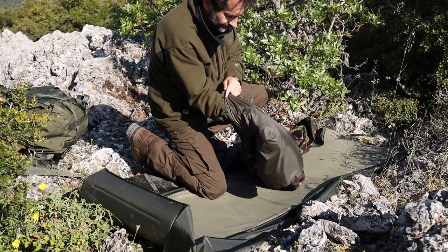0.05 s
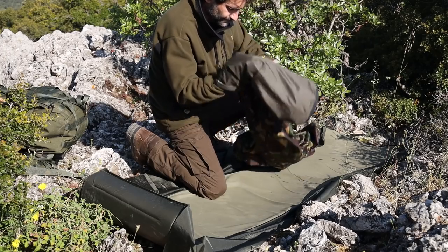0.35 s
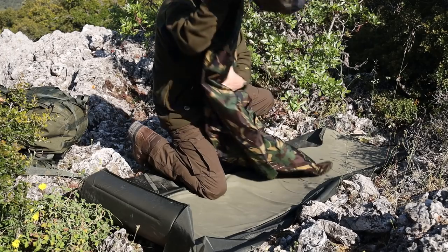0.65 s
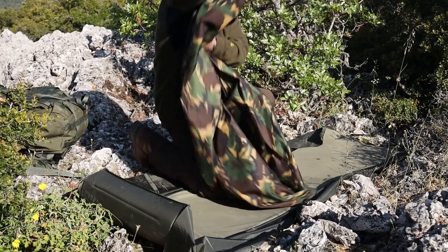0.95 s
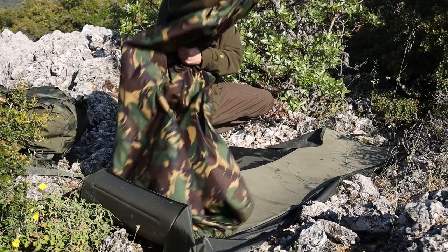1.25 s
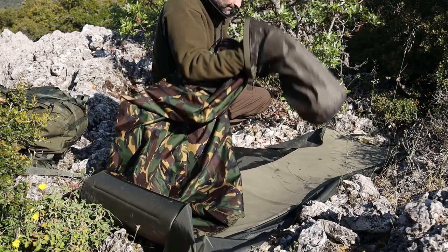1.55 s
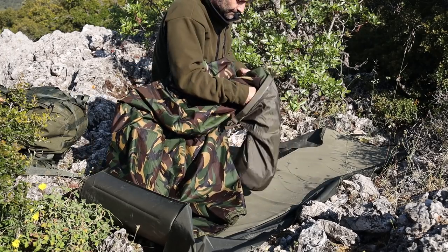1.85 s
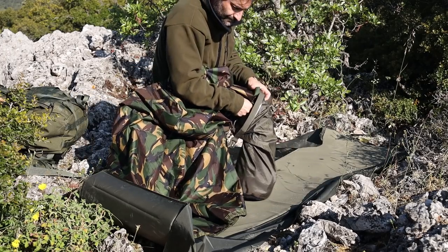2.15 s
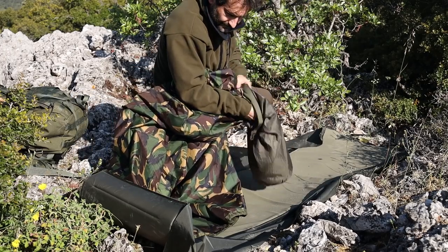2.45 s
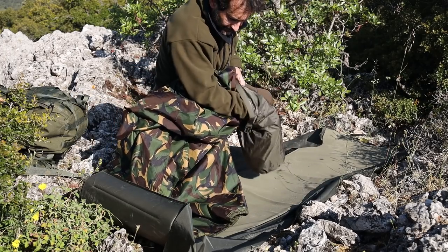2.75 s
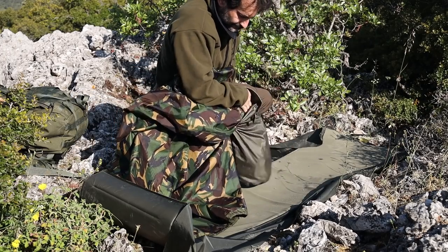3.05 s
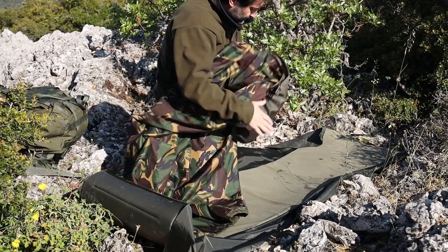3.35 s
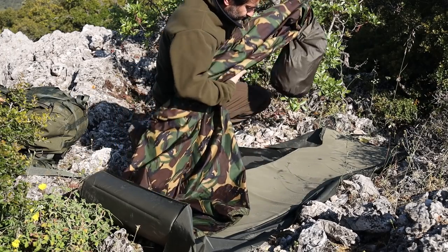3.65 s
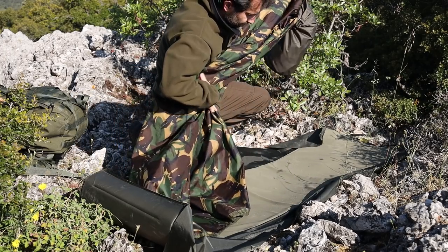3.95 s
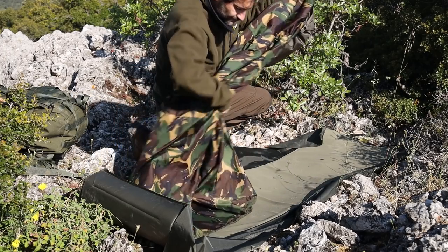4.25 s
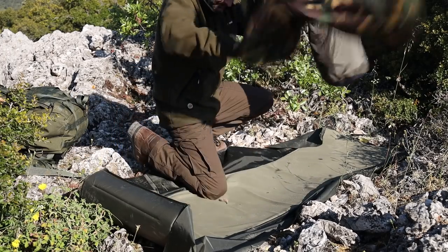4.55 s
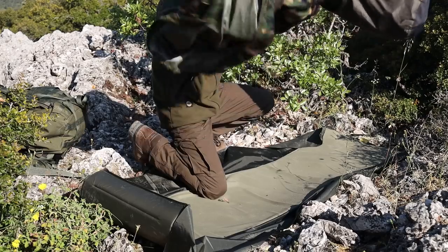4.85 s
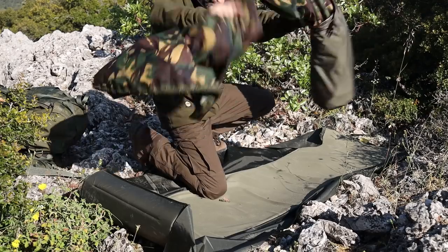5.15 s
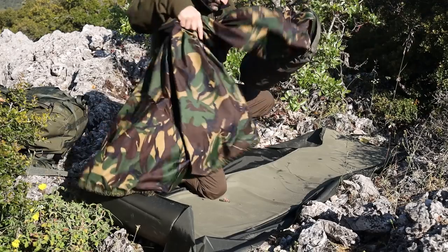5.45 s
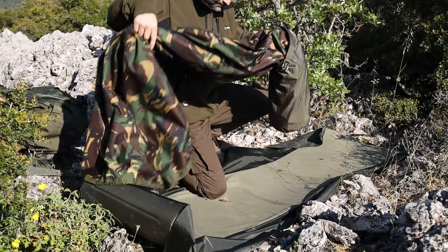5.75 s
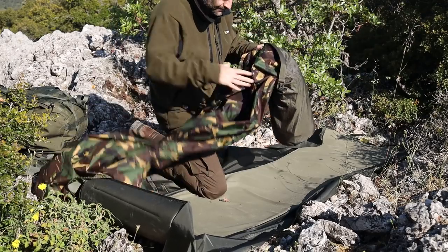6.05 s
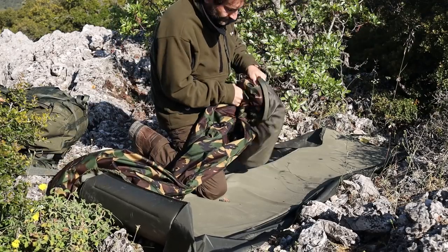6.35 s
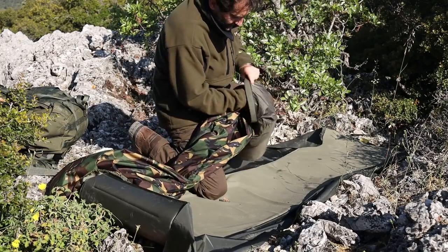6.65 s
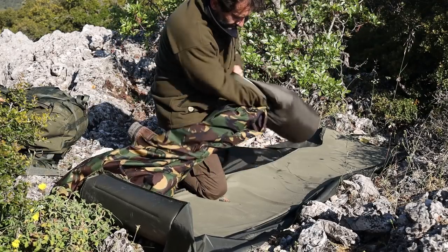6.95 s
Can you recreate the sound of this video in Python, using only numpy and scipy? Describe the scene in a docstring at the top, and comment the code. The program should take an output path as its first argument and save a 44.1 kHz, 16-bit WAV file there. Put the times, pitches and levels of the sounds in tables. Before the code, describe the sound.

A nylon sheet rustles and crinkles as it is pulled from a sack, shaken with loud flaps, then stuffed back, close up outdoors.

```python
"""A soft hiss of nylon sliding on nylon comes first: a camouflage sheet is pulled out of its sack,
outdoors, close to a single microphone. Small folds buckle in dense swarms, heavy folds thud, the weave
zips over itself and single creases pop. Shaken open, the sheet flaps and whips twice, shoving air at
the microphone; then it is stuffed back in. The ground below gives one short echo."""
import sys
import numpy as np
from scipy import signal
from scipy.fft import rfft, irfft, next_fast_len
from scipy.io import wavfile
from scipy.ndimage import map_coordinates

SR = 44100
rng = np.random.default_rng(int(sys.argv[2]) if len(sys.argv) > 2 else 0)


def store_wav(level_fs):
    """Save 16-bit WAV to argv[1]."""
    pcm = np.round(np.clip(np.atleast_2d(level_fs), -1, 1) * 32767)
    wavfile.write(sys.argv[1], SR, pcm.T.astype(np.int16))


N = 313351


def amp(db):
    """Decibels to gain."""
    return 10 ** (np.asarray(db) / 20)


def unit(x):
    """Scale to rms 1."""
    return x / np.sqrt(np.mean(x ** 2) + 1e-20)


def filtered(x, response):
    """Filter x by a gain that depends on frequency."""
    size = next_fast_len(len(x) + 8192)
    return irfft(rfft(x, size) * response(np.fft.rfftfreq(size, 1 / SR)), size)[:len(x)]


def colour(points):
    """Gain against frequency, through (frequency [Hz], level [dB]) points."""
    knots_hz, db = np.transpose(points)
    return lambda hz: amp(np.interp(np.log(hz + 1), np.log(knots_hz), db))


def coloured(x, points):
    """x with a colour, at rms 1."""
    return unit(filtered(x, colour(points)))


def wobble(rate):
    """A smooth random curve, rate knots a second."""
    return map_coordinates(rng.standard_normal(int(N * rate / SR) + 4), [np.arange(N) * rate / SR])


def add(track, s, sound):
    """Mix a sound into the track from time s."""
    start = max(round(s * SR), 0)
    part = track[start:start + len(sound)]
    part += sound[:len(part)]


def swell_at(t, length, rise_share):
    """A movement builds up for its share of the length, peaks at t = 0 and dies away."""
    return np.exp(-np.abs(t) / (length * np.where(t < 0, rise_share, 1 - rise_share)))


# Arms pull, shake and stuff the cloth in front of the microphone; levels are relative:
# (fastest moment [s], length [s], small folds [dB], sliding [dB], heavy folds [dB])
ARM_STROKES = [(0.028, 0.041, -58, -47, -60), (0.262, 0.27, -43.5, -47.5, -52), (0.425, .1, -56, -48, -64),
               (0.633, 0.36, -36, -42, -45.5), (0.84, 0.3, -42.5, -42.5, -53),
               (1.025, 0.19, -38, -46, -45.5), (1.172, 0.093, -37, -48.5, -71),
               (1.33, 0.27, -36.5, -47.5, -46), (1.59, 0.44, -44, -49.5, -51), (1.89, 0.2, -46, -51, -58),
               (2.21, 0.077, -55, -58.5, -62), (2.386, 0.17, -59, -48.5, -65),
               (2.562, .14, -37.5, -38, -44), (2.858, 0.36, -46, -49.5, -53),
               (3.244, 0.11, -42.5, -49.5, -42.5), (3.527, 0.25, -34.5, -42.5, -47.5),
               (3.672, 0.25, -46, -49, -65), (3.834, 0.24, -38.5, -45, -55),
               (4.16, 0.15, -41, -50.5, -49.5), (4.418, 0.23, -33.5, -43.5, -37.5),
               (4.618, 0.11, -19.5, -35, -45), (4.72, 0.12, -28, -33, -36), (4.814, 0.29, -32, -50, -50),
               (5.02, 0.25, -26.5, -37.5, -38), (5.293, 0.16, -25, -40.5, -41),
               (5.444, 0.14, -31, -43, -44), (5.526, 0.11, -36, -53, -40), (5.74, .2, -59, -55.5, -71),
               (6.066, 0.45, -38, -47.5, -47.5), (6.337, 0.25, -45.5, -48, -56),
               (6.468, 0.026, -43.5, -49, -45), (6.65, 0.27, -44, -49.5, -49.5),
               (6.82, 0.2, -45.5, -40, -50), (6.947, 0.11, -33.5, -38, -38)]

def handling(held_db=(-54, -56, -59)):
    """Levels of small folds, sliding and heavy folds: never quite at rest, swelling with each stroke."""
    t = np.arange(N) / SR
    power = np.outer(amp(held_db) ** 2, np.ones(N))
    for s, length, *levels_db in ARM_STROKES:
        reach = 1.31 * length  # the arm is at rest this long before and after its fastest moment
        moving = np.abs(t - s) < reach
        lag = t[moving] - s
        speed = swell_at(lag, length, rise_share=0.45) * (1 - (lag / reach) ** 4)
        power[:, moving] += np.outer(amp(levels_db), speed) ** 2
    return 10 * np.log10(power)


# Sliding nylon close up, and the thin top it gains when fast: (frequency [Hz], level [dB])
HISS_COLOUR = [(200, -25), (900, 5.5), (2000, 2.5), (3000, 2), (4200, -1.5), (5700, -3.5), (7300, -8),
               (10000, -11), (12700, -13.5), (14500, -21.5), (15700, -25)]
SIZZLE_COLOUR = [(3000, -23), (6000, 18), (8500, -8), (11500, -5), (13200, -8), (15700, -14)]

def sliding(db, catch_db=0.7, grain_db=1.3, brisk_db=-41, sizzle_db=-52, brightening=1.2):
    """Threads catch and slip as nylon slides on nylon; the sizzle grows until the slide is brisk."""
    grip = amp(catch_db * wobble(50) + grain_db * wobble(1300))
    hiss = amp(db + 4.5) * coloured(grip * rng.standard_normal(N), HISS_COLOUR)
    sizzle_gain = amp(sizzle_db + brightening * np.minimum(db - brisk_db, 0))
    return hiss + sizzle_gain * coloured(grip * rng.standard_normal(N), SIZZLE_COLOUR)


# Still outdoor air around the microphone: (frequency [Hz], level [dB])
AIR_COLOUR = [(20, -9), (150, -18.5), (800, -10), (3000, -12), (8000, -29), (15700, -23)]

def outdoor_air(db=-57):
    """A faint, steady wash of open air behind the cloth."""
    return amp(db) * coloured(rng.standard_normal(N), AIR_COLOUR)


def buckles(s, hz, size, cycles, samples):
    """Each fold that snaps through pushes the air briefly to and fro: small folds sound high."""
    width = cycles * SR / hz / 2
    reach = np.ceil(2 * width).astype(int)
    fold = np.repeat(np.arange(len(s)), 2 * reach)  # all pulses end to end: the fold of each sample
    centres = np.cumsum(2 * reach) - reach
    lag = np.arange(len(fold)) - centres[fold]
    phase = rng.uniform(0, 2 * np.pi, len(s))
    envelope = size[fold] * np.exp(-(lag / width[fold]) ** 2)
    push = envelope * np.cos(2 * np.pi * hz[fold] * lag / SR + phase[fold])
    position = np.round(s * SR).astype(int)[fold] + lag
    return np.bincount(position % samples, push, samples)


def swarm(rate, low_hz, high_hz, spread_db, cycles):
    """Folds of all sizes buckle at random, rate a second; the brief high ones peak higher."""
    when, pitch, force = rng.random((int(rate * N / SR), 3)).T
    hz = low_hz * (high_hz / low_hz) ** pitch
    return buckles(when * N / SR, hz, hz * amp(spread_db * force ** 2), cycles, N)


def avalanches(rate, life_s, spread_db):
    """Bursts of activity: each sets in at once and dies away."""
    when, force = rng.random((int(rate * N / SR), 2)).T
    kicks = np.bincount((when * N).astype(int), amp(spread_db * force ** 2), N)
    activity = signal.lfilter([1], [1, -np.exp(-1 / (life_s * SR))], kicks)
    return activity / activity.mean()


# Wrinkles crumpling near the microphone: (frequency [Hz], level [dB])
CRUMPLE_COLOUR = [(120, -31), (260, -4), (400, -5), (580, 0.5), (760, 1), (950, -2.5), (1400, -3.5),
                  (2000, -9), (3000, -17.5), (5000, -23), (10000, -50)]

def small_folds(db, steady_db=1):
    """Wrinkles buckle in bursts, as when one sets off its neighbours."""
    folds = swarm(rate=2200, low_hz=228, high_hz=5000, spread_db=6, cycles=1.16)
    crumple = coloured(folds, CRUMPLE_COLOUR)
    activity = amp(steady_db) + avalanches(rate=110, life_s=0.0072, spread_db=9.5)
    return amp(db + 1) * unit(crumple * np.sqrt(activity))


# The low body of the bundle, heard close: (frequency [Hz], level [dB])
BUNDLE_COLOUR = [(20, -28), (45, -36), (75, -12.5), (120, -4), (200, 3), (290, 2), (420, -2.5), (900, -69)]

def heavy_folds(db):
    """The bulk of the bundle shifts with soft thuds."""
    thuds = swarm(rate=600, low_hz=39, high_hz=487, spread_db=14.5, cycles=1.1)
    return amp(db + 2.5) * coloured(thuds, BUNDLE_COLOUR)


# The cloth's bright edge at close range, in ticks, swishes and cracks: (frequency [Hz], level [dB])
CRISP_COLOUR = [(600, -28), (1500, 11), (2500, 11.5), (4200, -0.5), (5700, -2), (7500, -9), (12500, -15.5),
                (15700, -31)]

def crinkles(db, relative_db=-14):
    """The stiff coating ticks faintly wherever it is bent."""
    ticks = swarm(rate=130, low_hz=1500, high_hz=9000, spread_db=19, cycles=0.62)
    return amp(db + relative_db) * coloured(ticks, CRISP_COLOUR)


CREASE_HZ = 840  # pitch of a typical crease

def stray_pops(db, rate=9, above_db=7, spread_db=6, cycles=1.7):
    """Lesser creases flip at random, as strongly as the cloth is worked."""
    when, pitch, force = rng.random((int(rate * N / SR), 3)).T
    size = amp(db[(when * N).astype(int)] + above_db + spread_db * force)
    hz = CREASE_HZ * 2 ** (2 * pitch - 1)  # up to an octave either way
    return buckles(when * N / SR, hz, size, cycles, N)


# The weave rubs over itself near the microphone:
# (start [s], length [s], first pitch [Hz], last pitch [Hz], width [Hz], level [dB])
WEAVE_RUBS = [(0.327, 0.42, 2710, 5920, 1700, -47.5), (0.818, .13, 6080, 3400, 1400, -46.5),
              (1.041, 0.032, 4900, 4880, 900, -40), (4.583, 0.028, 3800, 8060, 1100, -32),
              (4.617, .028, 10500, 13000, 1100, -44), (4.72, 0.033, 5340, 5270, 700, -36),
              (4.737, 0.057, 14650, 8200, 1100, -41), (4.783, 0.033, 3000, 2580, 503, -32.5),
              (6.30, 0.26, 3930, 12500, 3000, -57), (6.599, .42, 3590, 5220, 2200, -45.5),
              (6.659, 0.35, 10500, 9500, 5500, -46.5)]

def zips():
    """Ribs of the weave tick past each other: the pitch follows the speed, uneven ribs blur it."""
    out = np.zeros(N)
    for s, length, first_hz, last_hz, width_hz, db in WEAVE_RUBS:
        n = int(length * SR)
        phase = 2 * np.pi * np.cumsum(np.linspace(first_hz, last_hz, n)) / SR
        blur = [filtered(noise, lambda hz: np.exp(-2 * (hz / width_hz) ** 2))
                for noise in rng.standard_normal((2, n))]
        glide = unit(blur[0] * np.cos(phase) + blur[1] * np.sin(phase))
        add(out, s, amp(db) * np.hanning(n) * glide)
    return out


# The whole sheet radiates weakly in the bass and rings hollow in the low middle:
# (frequency [Hz], gain [dB])
SHEET_RESPONSE = [(25, -24), (60, -18), (125, -11.5), (200, -4.5), (320, -7), (490, -5), (620, 0.5),
                  (800, -2.5), (1200, -1), (2500, -5.5), (6000, -3)]
# The sheet flaps or is crushed in front of the microphone:
# (time [s], relative level [dB], length [s], nominal pitch [Hz], relative swish [dB])
SHEET_FLAPS = [(0.55, -27.5, 0.025, 950, -11), (0.784, -25.5, 0.041, 930, -9),
               (0.969, -26.5, 0.061, 840, -12.5), (1.339, -28, 0.063, 553, -21),
               (3.497, -20, 0.011, 450, -18), (3.548, -23.5, .012, 596, -29),
               (4.386, -22.5, 0.0099, 530, -14), (4.42, -20, 0.013, 447, -26),
               (4.441, -15.5, 0.016, 380, -18), (4.525, -12.5, 0.0062, 514, -16.5),
               (4.622, -6, .028, 585, -17), (4.64, -16.5, 0.019, 740, -3.5), (4.702, -5, 0.022, 810, -15),
               (4.705, -9, 0.0065, 1400, -1), (4.721, -9, .009, 780, -11), (4.969, -18, .027, 870, -10.5),
               (5.019, -15.5, .034, 870, -13.5), (5.094, -16, .026, 850, -15.5),
               (5.274, -16.5, .02, 890, -21), (5.301, -11, .021, 665, -31), (5.485, -12, .012, 470, -33),
               (6.914, -19.5, 0.019, 250, -17), (6.954, -29, 0.034, 500, -12)]

def flaps(rate=2200, pitch_spread=0.61, cycles=0.98, size_db=3):
    """A wave runs down the sheet: folds crowd together, with a swish of fast cloth."""
    out = np.zeros(N)
    swish = coloured(rng.standard_normal(N) * amp(2 * wobble(700)), CRISP_COLOUR)
    for s, db, length, hz, swish_db in SHEET_FLAPS:
        t = np.arange(-2 * length, 3 * length, 1 / SR)
        swell = swell_at(t, length, rise_share=0.46)
        count = int(rate * len(t) / SR)
        pitch, force = np.clip(rng.standard_normal((count, 2)), -2, 2).T
        when = (np.arange(count) + rng.random(count)) / rate
        fold_hz = 1.137 * hz * np.exp(pitch_spread * pitch)
        folds = buckles(when, fold_hz, amp(size_db * force), cycles, len(t))
        hiss = swish[(round(s * SR) + np.arange(len(t))) % N]
        flap = unit(folds * swell) + amp(swish_db + 5.5) * unit(hiss * swell)
        add(out, s + t[0], amp(db) * np.sqrt(np.mean(swell ** 2)) * flap)
    return filtered(out, colour(SHEET_RESPONSE))


# The loudest creases snap through, close by: (time [s], level [dB], pitch [Hz], flutter [cycles])
CREASE_SNAPS = [(0.542, -24.5, 990, 5.1), (0.552, -24, 1000, 4), (0.609, -21.5, 890, 1.2),
                (1.033, -18, 1120, 1.2), (1.178, -24.5, 536, 3.3), (1.21, -27, 540, 2.4),
                (1.305, -19.5, 750, 1.1), (1.45, -23, 747, 0.85), (1.46, -26, 1350, 1.5),
                (1.83, -26.5, 860, 1), (2.031, -31, 1900, 1.4), (2.943, -23.5, 1070, 0.75),
                (3.212, -21.5, 1100, 1.6), (3.254, -22.5, 700, 1.1), (3.355, -24, 970, 0.87),
                (3.443, -18.5, 765, 1.4), (3.483, -21, 800, 1), (3.498, -20, 730, 1.7),
                (3.576, -19, 736, 1.7), (3.583, -22, 1360, 1.9), (3.765, -21.5, 1500, 0.56),
                (4.124, -23.5, 316, 1), (4.369, -21, 520, 1.2), (4.386, -21, 700, 1.2),
                (4.412, -19, 900, 0.82), (4.438, -11, 358, 1.6), (4.494, -20.5, 614.5, 1.5),
                (4.574, -14, 900, 0.88), (4.622, -3, 463, 3.4), (4.822, -16, 760, 1.2),
                (4.943, -11.5, 960, 1.1), (4.974, -10.5, 1700, 0.96), (5.028, -8.5, 654, 1.9),
                (5.064, -14, 660, 1.5), (5.103, -13, 580, 1.9), (5.16, -13, 1500, 0.75),
                (5.267, -13, 900, 1.9), (5.316, -12, 667, 1.6), (5.45, -16, 940, 1),
                (5.479, -16.5, 820, 1.5), (5.694, -28.5, 605, 2.8), (5.9, -26.5, 422, 0.82),
                (6.32, -28, 1220, 3.4), (6.582, -28, 660, 1.7), (6.727, -22, 1050, 1.1),
                (6.972, -24, 1160, .9), (7.084, -29.5, 724, 1.6)]

def pops(crack_db=-15, crack_db_per_octave=5, crack_life_s=0.0035):
    """A taut crease flips over, flutters briefly and gives a tiny crack; tighter ones crack harder."""
    s, db, hz, cycles = np.transpose(CREASE_SNAPS)
    out = buckles(s, hz, amp(db), cycles, N)
    t = np.arange(SR // 50) / SR
    crack_gains = amp(db + crack_db + crack_db_per_octave * np.log2(hz / CREASE_HZ))
    for when, gain in zip(s, crack_gains):
        crack = coloured(rng.standard_normal(len(t)), CRISP_COLOUR) * np.exp(-t / crack_life_s)
        add(out, when, gain * crack)
    return out


# The billowing sheet shoves air at the microphone: (time [s], level [dB], pitch [Hz])
AIR_SHOVES = [(4.621, -30, 52), (4.706, -41, 48)]

def puffs(cycles=0.9):
    """Each whip gives one slow push of air from the whole sheet."""
    s, db, hz = np.transpose(AIR_SHOVES)
    return buckles(s, hz, amp(db), cycles, N)


def scene(ground_db=-14, ground_delay_s=0.002101):
    """At the microphone: the cloth, its ground echo by a path some 0.7 m longer, and still air."""
    small_db, slide_db, heavy_db = handling()
    rustle = heavy_folds(heavy_db) + small_folds(small_db) + crinkles(small_db) + sliding(slide_db)
    cloth = rustle + flaps() + puffs() + pops() + stray_pops(small_db) + zips()
    echo = filtered(cloth, lambda hz: amp(ground_db) * np.exp(-2j * np.pi * hz * ground_delay_s))
    return (cloth + echo + outdoor_air())[None]


def record(dry, ceiling=0.86, top_hz=15750):
    """The mono recorder rounds off the highest peaks and keeps nothing above its band limit."""
    rounded = dry[0] / (1 + np.abs(dry[0] / ceiling) ** 6) ** (1 / 6)
    return filtered(rounded, lambda hz: hz < top_hz)[None]


dry = scene()
out = record(dry)
store_wav(out)
```